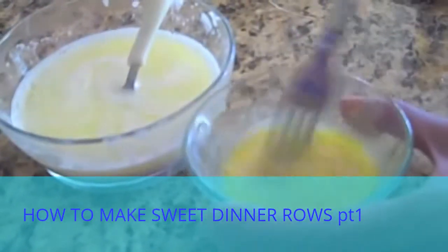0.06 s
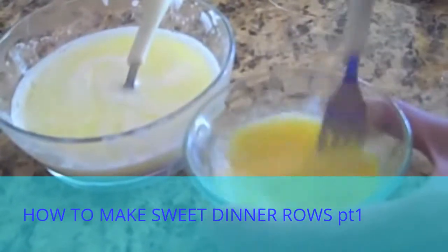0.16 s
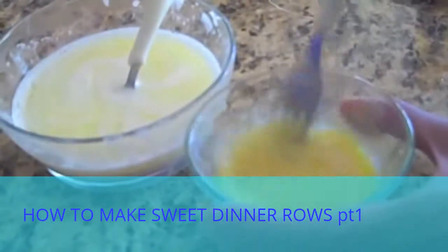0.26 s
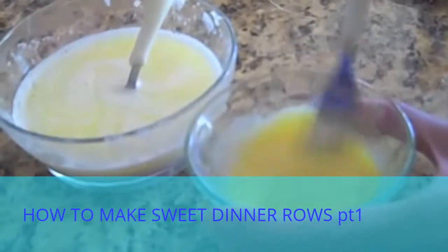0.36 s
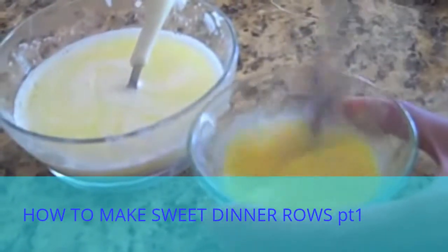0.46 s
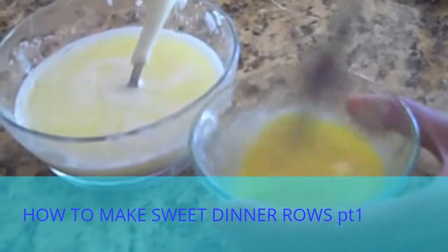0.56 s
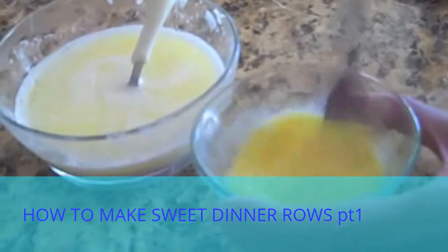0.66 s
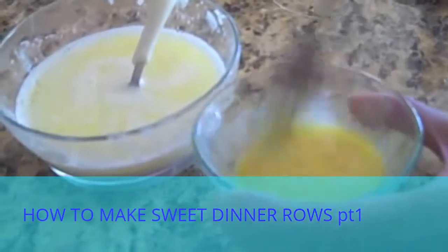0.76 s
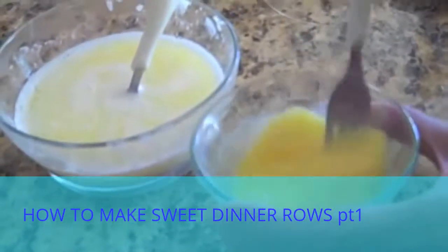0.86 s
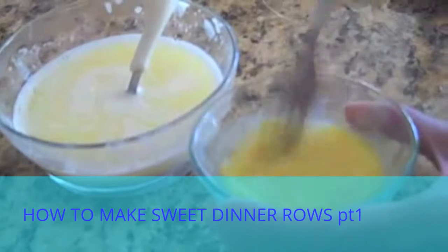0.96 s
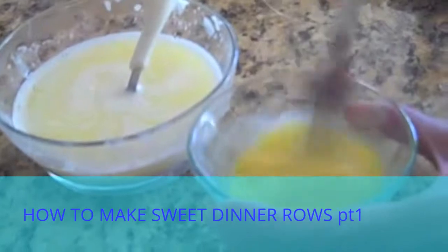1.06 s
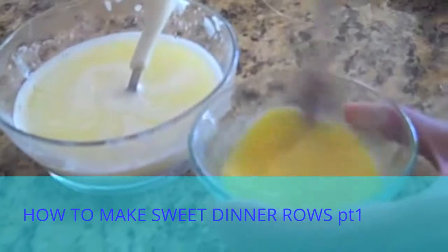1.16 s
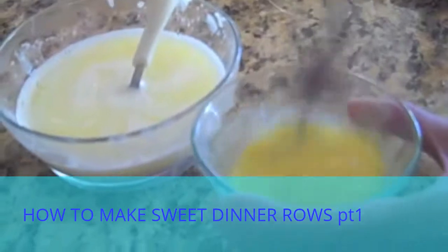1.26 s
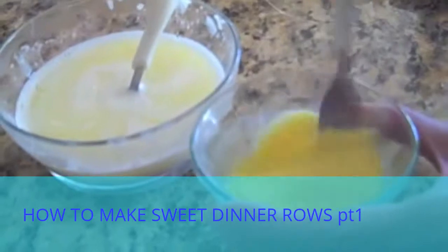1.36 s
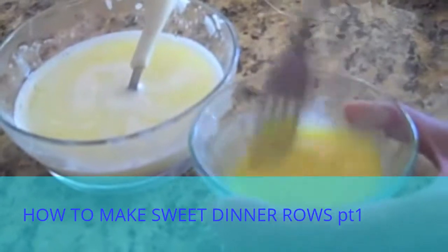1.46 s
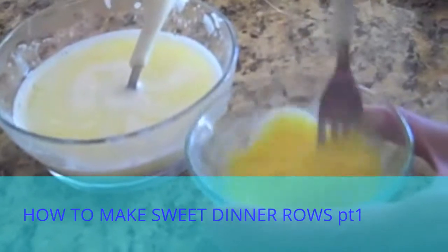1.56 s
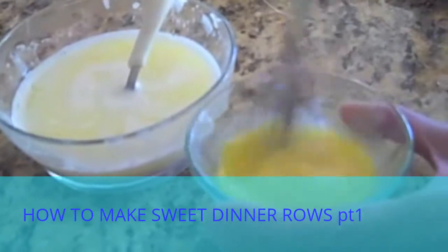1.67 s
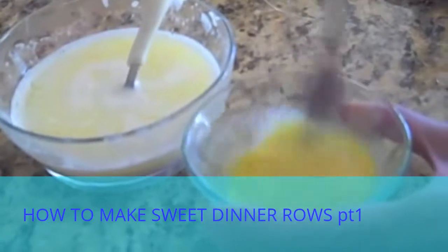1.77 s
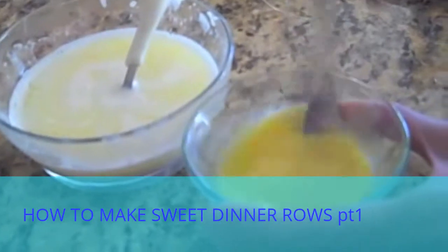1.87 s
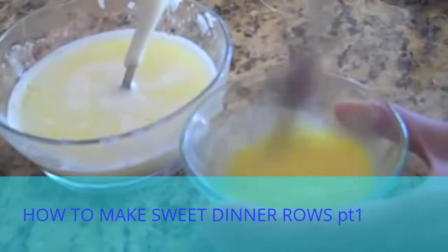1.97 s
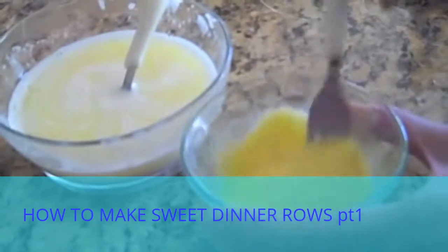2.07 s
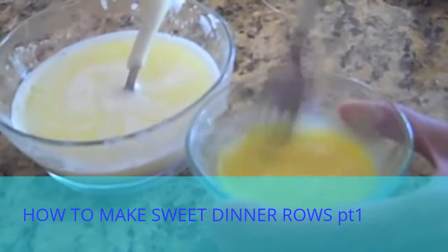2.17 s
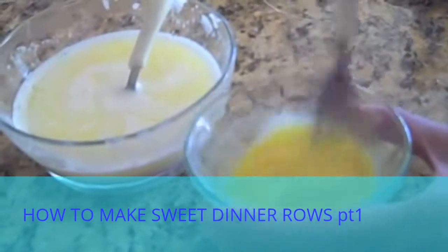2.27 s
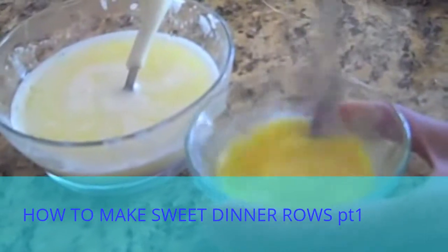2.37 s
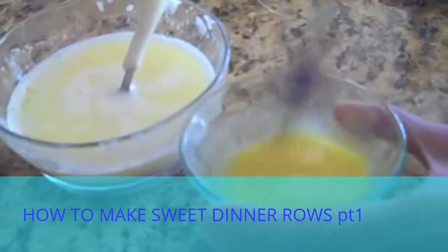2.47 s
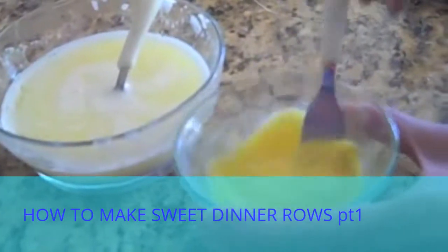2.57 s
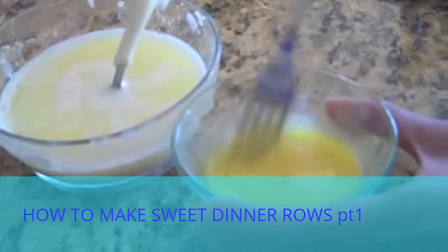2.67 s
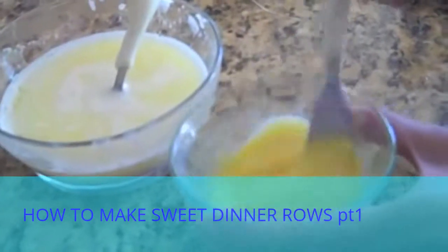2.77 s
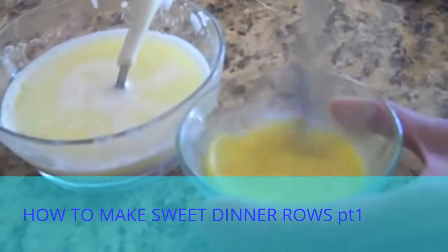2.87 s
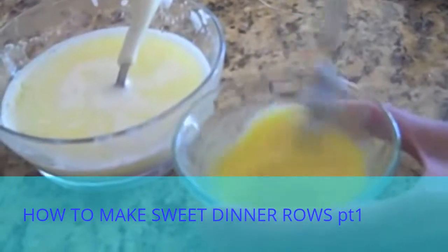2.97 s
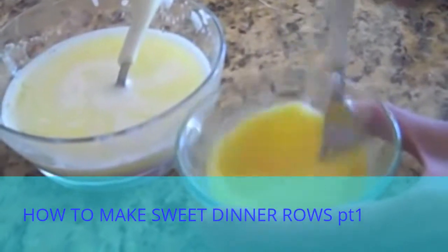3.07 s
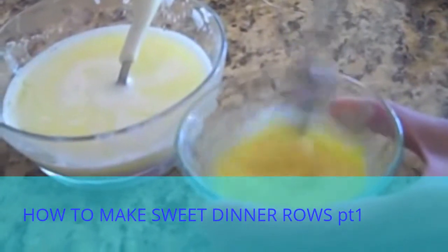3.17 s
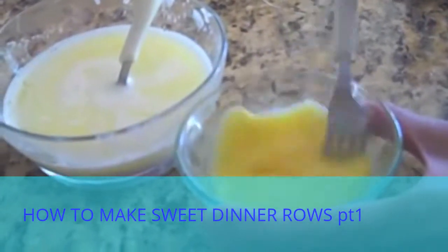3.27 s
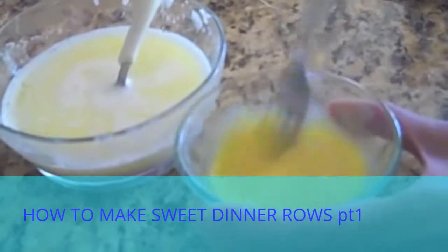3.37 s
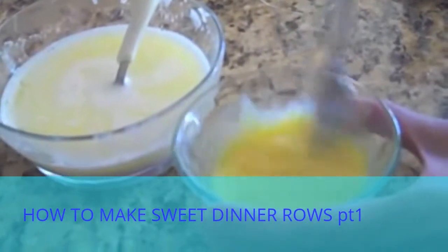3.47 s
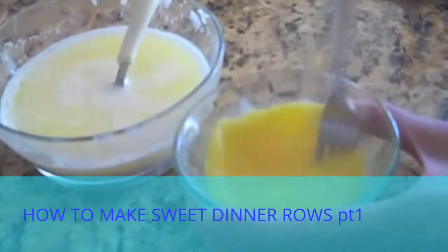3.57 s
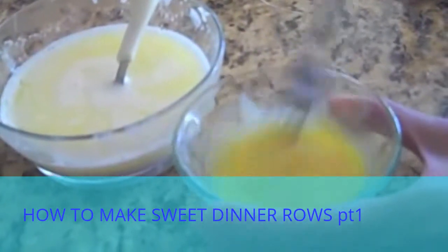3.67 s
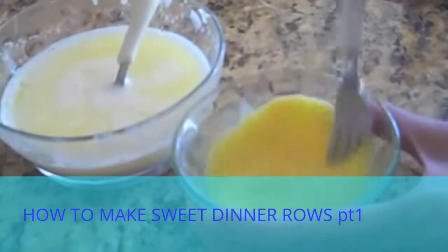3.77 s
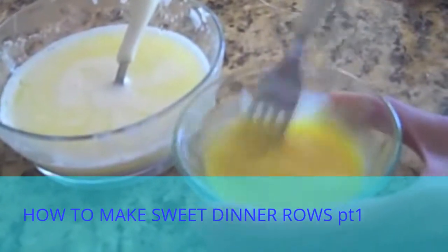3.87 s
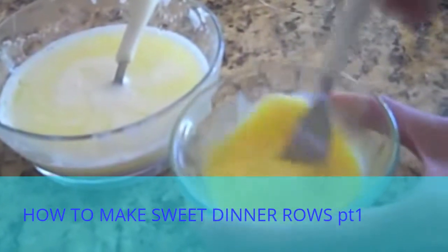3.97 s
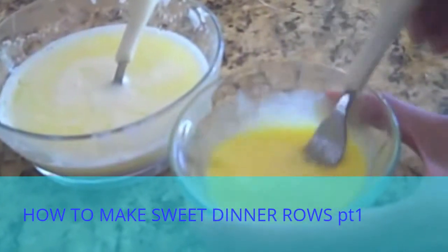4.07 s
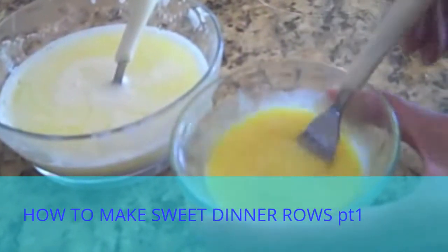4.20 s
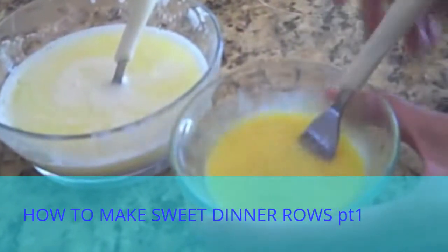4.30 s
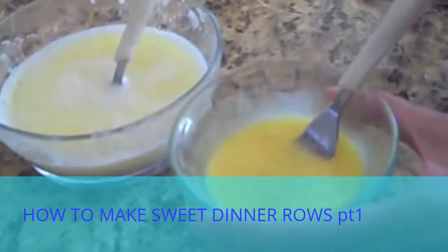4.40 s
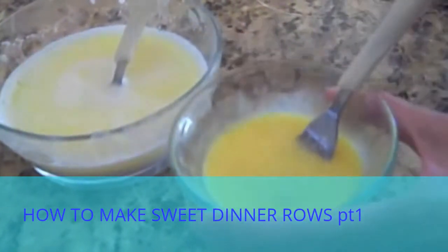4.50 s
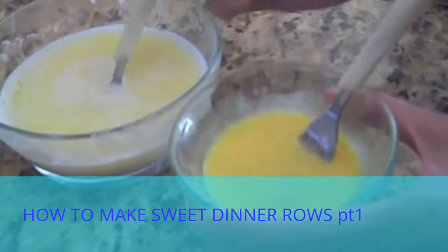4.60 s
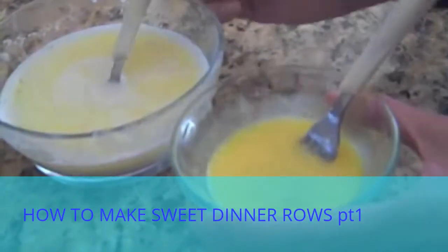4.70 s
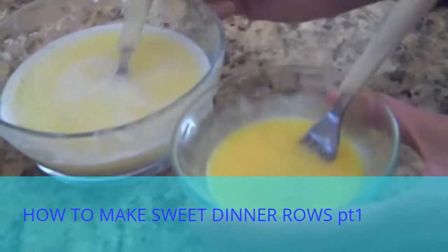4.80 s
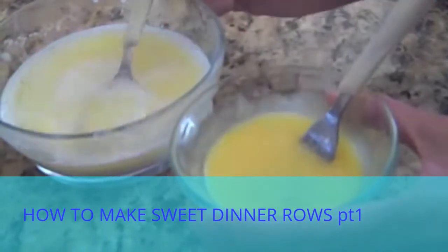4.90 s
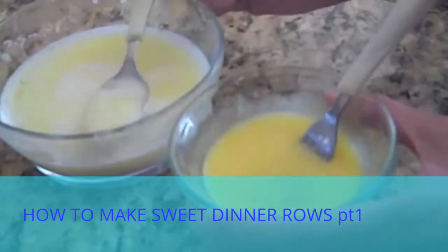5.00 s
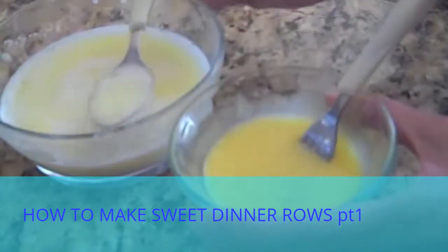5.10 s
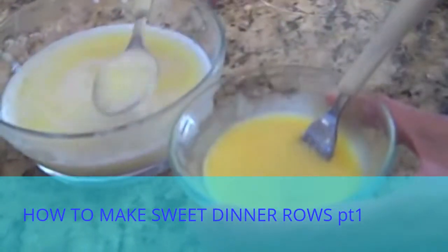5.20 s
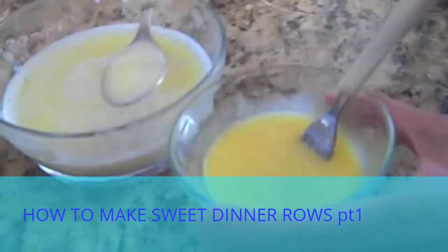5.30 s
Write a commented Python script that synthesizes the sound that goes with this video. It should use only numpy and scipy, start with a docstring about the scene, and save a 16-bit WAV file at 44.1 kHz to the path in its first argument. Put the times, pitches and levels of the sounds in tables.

```python
"""Fork beating egg in a glass bowl

A metal fork beats an egg in a small glass bowl, about six strokes a second, in a kitchen; its handle is
laid on the rim, then a spoon knocks in a large bowl. Impacts excite banks of decaying sine modes, with
short noise for the gaps between modes, and brief one-sided pulses add low thumps at the fork's hits.
Filtered noise makes the wet egg and the room, short rising sines the bubbles, and convolution with
decaying noise the kitchen's echo."""
import sys
import numpy as np
from scipy import signal
from scipy.fft import rfft, irfft
from scipy.io import wavfile

SR = 44100
rng = np.random.default_rng(int(sys.argv[2]) if len(sys.argv) > 2 else 0)


def store_pcm(level_fs):
    """Save levels as 16-bit WAV."""
    pcm = np.round(np.clip(level_fs, -1, 1) * 32767).astype(np.int16)
    wavfile.write(sys.argv[1], SR, np.atleast_2d(pcm).T)


N = 235670
AGE = np.arange(SR // 7) / SR   # time since a contact (s)
TIME = np.arange(N) / SR   # time in the scene (s)

# fork strikes on the small bowl, ring levels before register balance: t/s, glass level/dB,
# metal level/dB, favoured mode f/Hz, its boost/dB, slide decay/s, low overload thump level/dB
FORK_HITS = [(0.178, -38, -34.5, 2320, 4, 0.0012, -82), (0.3585, -41.5, -37, 2320, 12.5, 0.00033, -77),
             (0.552, -43, -37, 2320, 3.5, 0.00011, -80), (0.7113, -38.5, -30, 2320, 14.5, 0.00054, -41.5),
             (0.8827, -37.5, -33, 2320, 3.5, 0.00046, -46), (1.0465, -39, -31.5, 2320, 11, 0.00022, -62),
             (1.2284, -35, -35, 2320, 4, 0.0024, -38.5), (1.4007, -36.5, -32, 2320, 9, 0.00061, -61),
             (1.5722, -36, -34, 3650, 2.5, 0.0011, -52.5), (1.7388, -36.5, -33, 2320, 7.5, 0.00013, -57),
             (1.8876, -38, -39, 4460, 13.5, 0.0044, -60), (2.0927, -43, -37, 2320, 1.5, 0.00049, -51),
             (2.2519, -40.5, -32, 1870, 1.5, .0004, -57.5), (2.4158, -39.5, -29.5, 2930, 6.5, 0.00016, -42),
             (2.5719, -28.5, -53, 4870, 18, 0.0012, -32), (2.7717, -40, -33.5, 2320, 3.5, .0002, -68),
             (2.9535, -39, -31, 1186, 11, 0.0014, -35.5), (3.108, -36, -35, 2620, 9.5, 0.0013, -61),
             (3.2754, -40.5, -40, 1960, 7.5, 0.0024, -67), (3.308, -39.5, -34, 3330, 3.5, 0.0021, -60),
             (3.4454, -36, -30.5, 2320, 14, 0.00036, -43), (3.6142, -41.5, -39.5, 2600, 6, 0.00085, -75),
             (3.7957, -38.5, -35, 1167, 8.5, 0.00051, -53.5), (3.9321, -32, -38, 4000, 14.5, 0.0069, -61)]
# modes of the small bowl, damped by fork, hand and egg: f/Hz, relative level/dB, t60/s
BOWL_MODES = [(852, -23.5, 0.013), (1159, -15.5, 0.039), (1477, -11, 0.028), (1712, -8, 0.021),
              (1859, -4, 0.025), (2338, 0.5, 0.025), (2660, -1, 0.011), (2940, 1.5, 0.0065),
              (3290, -1, 0.021), (3464, -3, 0.02), (4095, -4, 0.019), (4250, -17.5, 0.015),
              (4750, -30.5, 0.5), (4810, -30.5, 0.55), (4950, -33, 0.45), (4790, -4.5, 0.0074),
              (4970, -2.5, 0.0025)]
# modes of the tines pressed on the glass: f/Hz, relative level/dB, t60/s
TINE_MODES = [(5520, -7, 0.0048), (5930, -2, 0.0058), (6573, -10, 0.0042), (7230, -6.5, 0.007),
              (7430, -9, 0.0043), (8726, 8, 0.024), (9380, -4, 0.022), (10040, 2.5, 0.016),
              (11860, 6, 0.011), (13000, -8, 0.018)]
# edges of the low, middle, high and top registers of a ring: f/Hz
REGISTERS = [600, 2750, 5100, 8100, 15000]
# stirring of the egg, reference for hiss and small drops: t/s, level/dB
STIRRING = [(0.0, -54.5), (0.22, -68), (0.61, -70.5), (0.79, -65), (1.16, -72), (1.98, -56.5),
            (2.35, -64.5), (2.56, -65), (2.94, -69.5), (3.3, -68), (4.12, -63.5), (4.4, -69), (5.34, -66)]

PRESS_SPREAD = 0.012   # spread of the metal's pitch from one press to the next (share)
BEATING_ENDS_S = 3.85
GRAZE_LEAD_S = .017   # mean time from a graze to its hit


def from_db(db):
    """Level to amplitude ratio."""
    return 10 ** (np.asarray(db) / 20)


def rms_one(x):
    """Scales a steady sound to rms 1."""
    return x / np.sqrt(np.mean(x ** 2) + 1e-20)


def burst_one(x):
    """Scales a short sound (or each row) to the energy of 10 ms at rms 1."""
    return x / np.sqrt(np.sum(x ** 2, axis=-1, keepdims=True) / (SR / 100) + 1e-20)


def at_hz(points, hz):
    """Interpolates a spectrum on a log-frequency axis."""
    points = np.array(points)
    return np.interp(np.log(hz), np.log(points[:, 0]), points[:, 1])


def cut(x, hz, kind, order=2):
    """Butterworth filter: maximally flat in its passband."""
    return signal.sosfilt(signal.butter(order, hz, kind, fs=SR, output="sos"), x + 1e-18)


def add(track, s, sound):
    """Superposition: mixes a sound in at time s."""
    start = max(round(s * SR), 0)
    track[start:start + len(sound)] += sound[:max(N - start, 0)]


def ring(hz, t60, age=AGE):
    """Damped oscillator: a sine with exponential decay."""
    return np.sin(2 * np.pi * hz * age) * np.exp(-np.log(1000) * age / t60)


def noise(colour):
    """Spectral shaping: steady noise with a given spectrum, at rms 1."""
    gain = from_db(at_hz(colour, np.maximum(np.arange(N // 2 + 1) * SR / N, 1)))
    return rms_one(irfft(rfft(rng.standard_normal(N)) * gain, N))


def beating():
    """Impact excitation: fork strokes and their rebounds ring bowl and tines."""
    balance_db = [0.5, 1, 0.5, -5]   # low, middle, high and top registers: level/dB
    return hits(list(FORK_HITS) + rebounds(), BOWL_MODES, TINE_MODES, balance_db, PRESS_SPREAD, detune=.015)


def strokes_until(end_s):
    """Times of the fork's hits before end_s, the rhythm that paces the dependent sounds."""
    return [s for s, *_ in FORK_HITS if s < end_s]


def rebounds(glass_db=-2.5, metal_db=2.5, favoured_hz=2320, favour_db=1, slide_s=0.002):
    """Restitution: the tines bounce back onto the glass, with more metal than glass in the ring."""
    bounces = [(0.7331, -41), (0.903, -46.5), (1.2588, -44), (1.4304, -40.5), (1.9147, -36), (2.5936, -38),
               (2.7784, -45.5), (3.1203, -40), (3.1305, -49.5), (3.4832, -43.5), (3.628, -39.5),
               (3.9843, -45.5), (3.9912, -49)]   # second contacts: t/s, reference level/dB
    return [(s, db + glass_db, db + metal_db, favoured_hz, favour_db, slide_s) for s, db in bounces]


def hits(table, glass_modes, metal_modes, balance_db, press_spread, detune,
         bending_top_hz=6800, top_glass_share=0.78):
    """Coupled impact: glass sets the two lower levels, metal the high one, and both the top."""
    out = np.zeros(N)
    for s, glass_db, metal_db, favoured_hz, favour_db, slide_s, *_ in table:
        top_db = metal_db + top_glass_share * (glass_db - metal_db)
        holds_favoured = np.diff(np.array(REGISTERS) > favoured_hz)
        levels_db = np.array([glass_db, glass_db, metal_db, top_db]) + balance_db
        # a share of the favoured mode's boost lifts its whole register
        levels_db = levels_db + 0.39 * favour_db * holds_favoured
        # the press shifts the pitch of the metal's bending modes
        press = 1 + press_spread * rng.standard_normal()
        metal = [(hz * press if hz < bending_top_hz else hz, db, t60) for hz, db, t60 in metal_modes]
        sound = strike(list(glass_modes) + metal, levels_db, favoured_hz, favour_db, slide_s, detune=detune)
        add(out, s, sound)
    return out


def strike(modes, levels_db, favoured_hz, favour_db, slide_s, travel_s=0.0029, scatter_db=3.0, detune=0.041,
           cracks_db=(-17, -13, -11, -4), crack_cycles=55, radiate_hz=780):
    """Modal superposition: one contact rings all modes, and where it lands favours some of them."""
    hz, mode_db, t60 = np.transpose(modes)
    # width as a share of frequency; a sliding contact travels and favours the neighbours too
    width = .045 * (1 + abs(slide_s) / travel_s)
    favour = np.exp(-(np.log(hz / favoured_hz) / width) ** 2)
    strength_db = mode_db + favour_db * favour + scatter_db * rng.standard_normal(len(hz))
    strength = from_db(strength_db) * (-1) ** np.arange(len(hz))
    # moving liquid loads the glass; modes over 0.1 s are long, steady ringing tails and keep their pitch
    shifted = hz * (1 + detune * (t60 < .1) * rng.standard_normal(len(hz)))
    resonances = ring(shifted[:, None], t60[:, None])
    driven = signal.fftconvolve(resonances, contact(slide_s)[None], axes=1)[:, :len(AGE)]
    rings = strength[:, None] * burst_one(driven)
    out = 0
    for low, high, level_db, crack_db in zip(REGISTERS, REGISTERS[1:], levels_db, cracks_db):
        # a noise crack stands for the crowd of weak, short modes between the clear ones
        fade = np.exp(-AGE / (crack_cycles / high / np.log(1000) + abs(slide_s)))
        crack = cut(rng.standard_normal(len(AGE)) * fade, [max(low, high / 2), high], "band")
        clear = rings[(hz >= low) & (hz < high)].sum(0)
        body = burst_one(clear) + from_db(crack_db) * burst_one(crack)
        out = out + from_db(level_db) * burst_one(body)
    return cut(out, radiate_hz, "high", order=2)   # a small object radiates little bass


def contact(slide_s, rough=0.23, mean_gap_s=.0005, later_touches=0.33):
    """Contact force: a first touch, three more (a fork's other tines), and slips that die away."""
    age = AGE[:len(AGE) // 8]
    slips = rng.standard_normal(len(age)) * (rng.random(len(age)) < .3)
    force = rough * slips * np.exp(-age / max(slide_s, 1e-4))
    force[0] = 1
    later = 1 + (rng.random(size=3) * 2 * mean_gap_s * SR).astype(int)
    force[later] += later_touches * rng.standard_normal(size=3)
    return force


def overload_thumps(time_constant_s=0.0002):
    """Overload pulse: a low thump at each fork hit, at its own level, is one brief, one-sided push."""
    out = np.zeros(N)
    for s, *_, thump_db in FORK_HITS:
        add(out, s, from_db(thump_db) * burst_one(AGE * np.exp(-AGE / time_constant_s)))
    return out


def grazes(level_db=-55, colour_db=(-7, -4, -5, -12), favoured_hz=3300, favour_db=3, scatter_db=3,
           lead_spread=.12, slide_s=.004):
    """Sliding friction: the tines skim the glass lightly just before each stroke."""
    out = np.zeros(N)
    for s in strokes_until(BEATING_ENDS_S):
        levels_db = level_db + scatter_db * rng.standard_normal() + np.array(colour_db)
        lead_s = GRAZE_LEAD_S * (1 + lead_spread * rng.standard_normal())
        add(out, s - lead_s, strike(BOWL_MODES + TINE_MODES, levels_db, favoured_hz, favour_db, slide_s))
    return out


def laid_on_rim():
    """Impact and sliding: the fork's handle is laid on the rim and rings the bowl and tine modes."""
    # contacts, ring levels before balance: t/s, glass level/dB, metal level/dB,
    # favoured mode f/Hz, its boost/dB, slide decay/s
    rim_hits = [(4.1569, -39.5, -47, 1610, 8.5, 0.0042), (4.1605, -49.5, -42.5, 880, 23, 0.021),
                (4.2191, -55, -60, 2910, 12, 0.0043)]
    balance_db = [4, 0.5, -3, -12.5]   # low, middle, high and top registers: level/dB
    return hits(rim_hits, BOWL_MODES, TINE_MODES, balance_db, PRESS_SPREAD, detune=0.045)


def spoon_in_large_bowl():
    """Impact excitation: a spoon knocks a large bowl and both ring in their own modes."""
    # contacts, ring levels before balance: t/s, glass level/dB, metal level/dB,
    # favoured mode f/Hz, its boost/dB, slide decay/s
    spoon_hits = [(4.6941, -59, -62, 7860, 22.5, .0003), (4.7835, -32, -40, 2470, 7, 0.0026),
                  (5.3228, -47, -33, 810, 16.5, 0.003)]
    large_bowl_modes = [(710, -28, 0.027), (815, -14.5, 0.065), (1410, -5.5, 0.14), (1617, -9.5, 0.099),
                        (1800, -6, 0.029), (2357, 0, 0.015), (2483, -0.5, 0.019), (2580, -20, 0.22),
                        (2640, -22, 0.096), (2730, 1, 0.029), (2800, -5.5, 0.02), (2930, -7.5, 0.026),
                        (3400, -17, 0.019), (4100, -9, 0.043), (4230, -16, 0.024)]   # large bowl: f/Hz, relative level/dB, t60/s
    spoon_modes = [(5870, 6, 0.036), (6430, -4.5, 0.017), (7800, -19.5, 0.039), (8400, -19, .012),
                   (10800, -11.5, 0.036), (12200, -7, .012)]   # spoon: f/Hz, relative level/dB, t60/s
    balance_db = [2.5, -2, -1, -25]   # low, middle, high and top registers: level/dB
    return hits(spoon_hits, large_bowl_modes, spoon_modes, balance_db, press_spread=0.0024, detune=.002)


def drips(brisk_ends_s=2.5, delay_s=.029, small_hz=4000, small_db=8, bubble_t60_s=.014,
          spread_s=0.0022, rise=3, pitch_spread=0.0336, delay_spread=0.084,
          splash_db=-4, splash_hz=(2000, 7000)):
    """Bubble resonance: a drop splashes and traps a small bubble whose pitch climbs as it dies."""
    big_drops = [(0.054, -56.5, 4030), (0.6089, -59, 3900), (1.9484, -50.5, 4100), (2.4728, -49.5, 2740)]   # larger drops that fall on their own: t/s, level/dB, f/Hz
    drops = []
    for s in strokes_until(brisk_ends_s):   # egg falls back after each stroke of the brisk beating
        drop_s = s + delay_s * (1 + delay_spread * rng.standard_normal())
        level_db = small_db + np.interp(s, *np.transpose(STIRRING))
        drops.append((drop_s, level_db, small_hz * (1 + pitch_spread * rng.standard_normal())))
    out = np.zeros(N)
    for s, level_db, hz in drops + list(big_drops):
        patter = rng.standard_normal(len(AGE)) * AGE * np.exp(-AGE / spread_s)
        # phase grows with age squared, so the pitch climbs by 2 * rise per second (share)
        rising = ring(hz * (1 + rise * AGE), bubble_t60_s)
        bubble = burst_one(signal.fftconvolve(patter, rising)[:len(AGE)])
        splash = from_db(splash_db) * burst_one(cut(patter, splash_hz, "band"))
        add(out, s - spread_s, from_db(level_db) * (bubble + splash))
    return out


def swish(level_db=-57, attack_s=0.0027, decay_s=0.038):
    """Turbulent noise: the flung egg hisses up quickly after each hit and dies away."""
    swish_colour = [(700, -27), (1600, 2), (4000, -1), (6500, -1.5), (13000, -13)]   # flung egg: f/Hz, relative level per Hz/dB
    envelope = np.zeros(N)
    for s in strokes_until(BEATING_ENDS_S):
        add(envelope, s, (1 - np.exp(-AGE / attack_s)) * np.exp(-AGE / decay_s))
    return from_db(level_db) * envelope * noise(swish_colour)


def slosh(gain_db=-3):
    """Flow noise: egg stirred by the tines gives a faint wet hiss."""
    slosh_colour = [(900, -11), (1600, -3.5), (2350, -0.5), (3200, -2.5), (5000, -6), (7500, -7),
                    (10000, -11.5), (13000, -17.5)]   # stirred egg: f/Hz, relative level per Hz/dB
    return from_db(gain_db + np.interp(TIME, *np.transpose(STIRRING))) * noise(slosh_colour)


def moving_echo(x, count=5):
    """Changing reflection paths: bowl and hand shift, so strokes cycle through different echoes."""
    place = np.searchsorted(np.array(strokes_until(np.inf)) - GRAZE_LEAD_S, TIME) % count
    return sum(kitchen(x * (place == k)) for k in range(count))


def kitchen(x, tail_db=-19, early_db=-19, early_t60=0.023, gap_s=0.00267):
    """Reverberation: quick reflections from counter and cupboards, then a faint frequency-dependent tail."""
    echo_colour = [(200, -61), (1000, 11), (2300, 8.5), (3600, -9), (4800, -4), (6200, -8), (13000, 14.5)]   # echo tail: f/Hz, relative level/dB
    echo_t60 = [(200, 0.13), (2300, 0.52), (6000, 0.52), (13000, 0.16)]   # decay of the tail: f/Hz, t60/s
    age = TIME[:SR * 2 // 3]
    edges = 125 * 2. ** np.arange(8)   # octave bands (Hz)
    tail = 0
    for low, high in zip(edges, edges[1:]):
        hz = np.sqrt(low * high)
        band = cut(rng.standard_normal(len(age)), [low, high], "band")
        decay = np.exp(-np.log(1000) * age / at_hz(echo_t60, hz))
        tail = tail + from_db(at_hz(echo_colour, hz)) * band * decay
    sparse = rng.standard_normal(len(age)) * (rng.random(len(age)) < .05)
    early = sparse * np.exp(-np.log(1000) * age / early_t60)
    after_gap = age > gap_s
    echo = from_db(tail_db) * rms_one(tail * after_gap) + from_db(early_db) * rms_one(early * after_gap)
    return signal.fftconvolve(x, echo / np.sqrt(len(age)))[:N]


def background(room_db=-61.5):
    """Stationary noise and pure tones: the kitchen's steady noise with a faint hum in it."""
    room_colour = [(20, 5), (40, -14.5), (90, -13), (130, -12.5), (160, -16), (230, -7.5), (330, -10.5),
                   (520, -8), (750, -8.5), (1500, -13.5), (4000, -26), (8000, -36.5), (13000, -35)]   # kitchen noise: f/Hz, relative level per Hz/dB
    hum_tones = [(355.3, -77.5), (506.0, -78), (662.1, -82), (839.8, -84.5)]   # steady hum: f/Hz, level/dB
    hum = 0
    for hz, db in hum_tones:
        hum = hum + from_db(db) * rms_one(np.sin(2 * np.pi * (hz * TIME + rng.random())))
    return from_db(room_db) * noise(room_colour) + hum


def scene():
    """Superposition: fork, egg and spoon close by, in a quiet kitchen."""
    fork = beating() + grazes() + overload_thumps() + laid_on_rim()
    near = fork + spoon_in_large_bowl() + drips()
    return (near + moving_echo(near) + swish() + slosh() + background())[None]


def record(dry):
    """Elliptic low-pass: the treble is cut steeply above 13.5 kHz."""
    return signal.sosfilt(signal.ellip(8, .3, 60, 13500, fs=SR, output="sos"), dry)


dry = scene()
out = record(dry)
store_pcm(out)
```